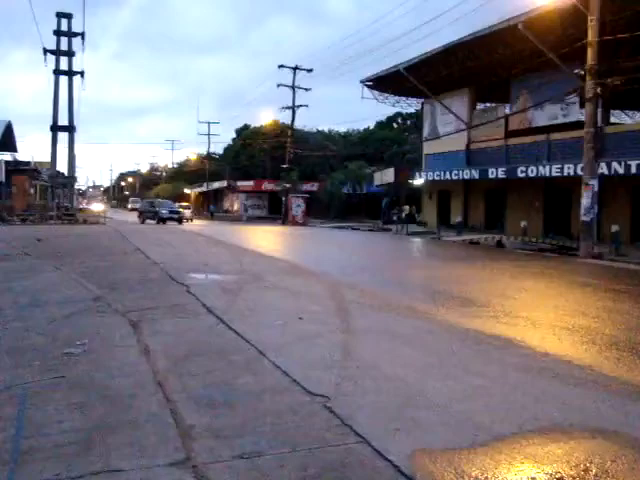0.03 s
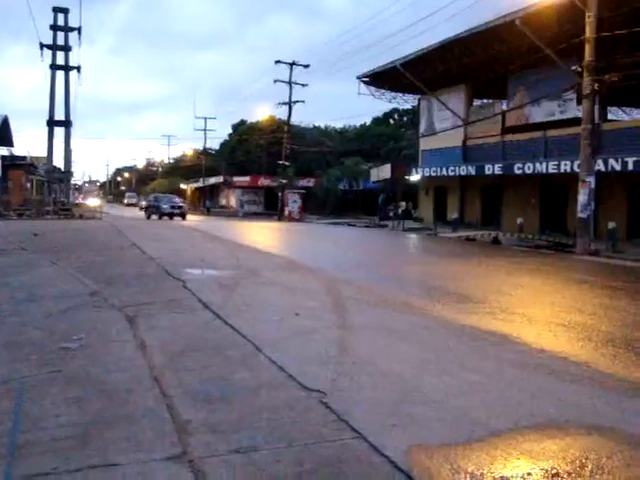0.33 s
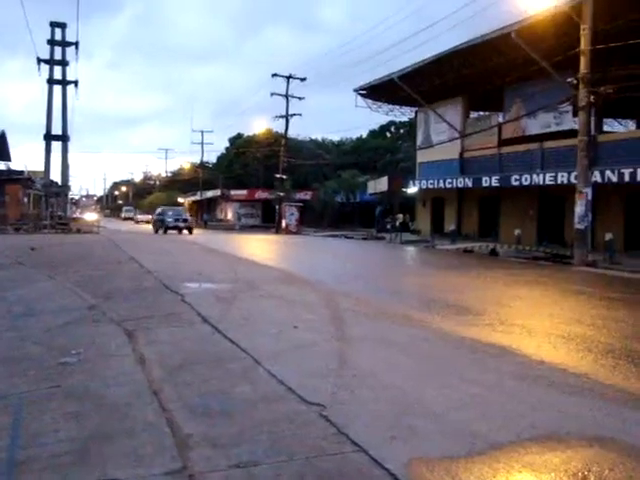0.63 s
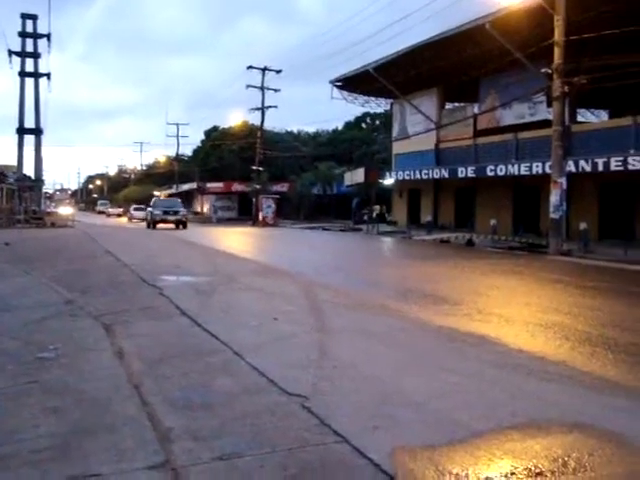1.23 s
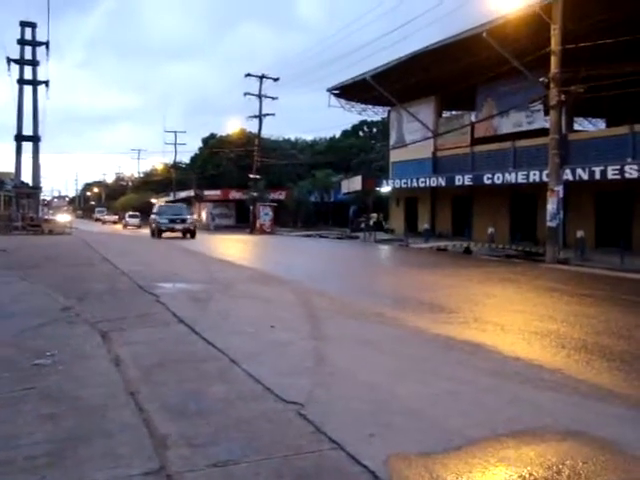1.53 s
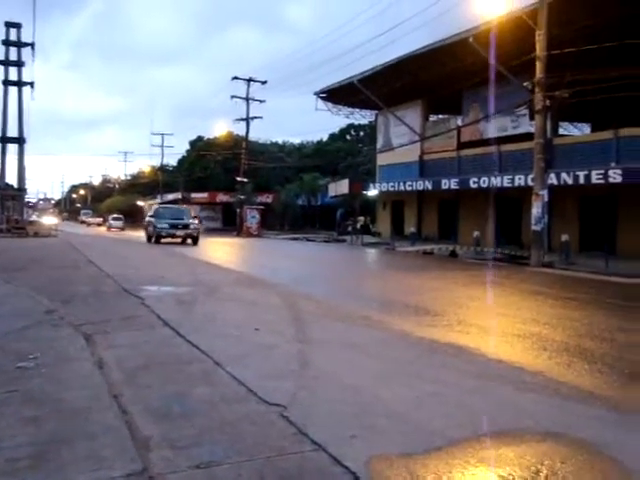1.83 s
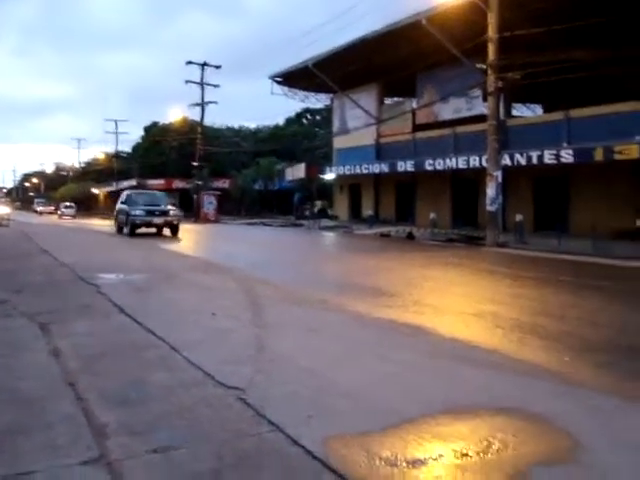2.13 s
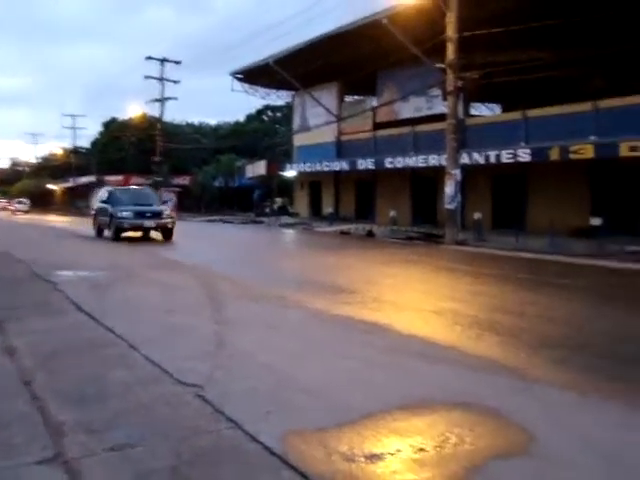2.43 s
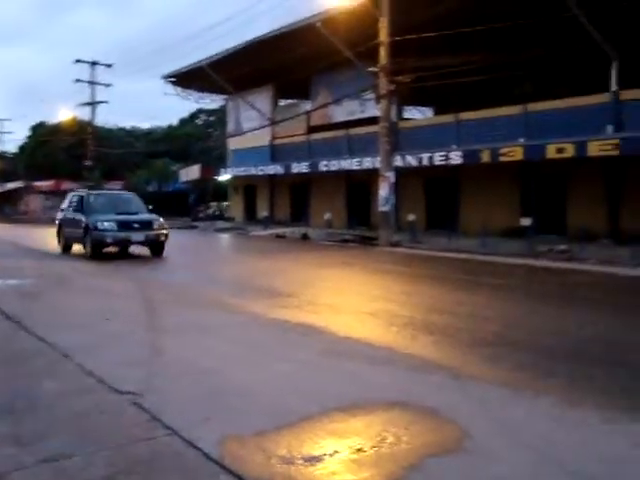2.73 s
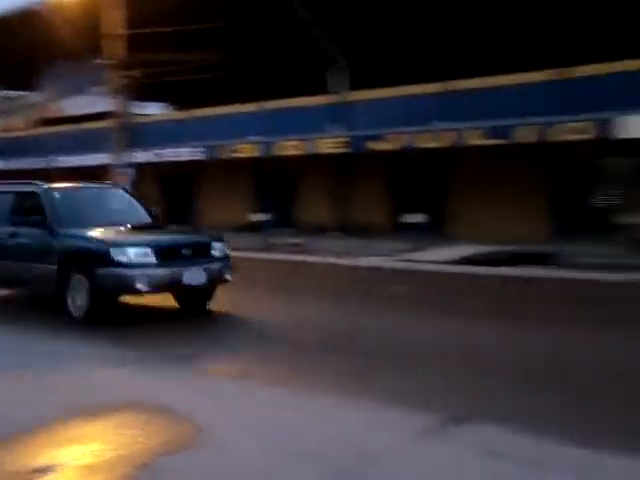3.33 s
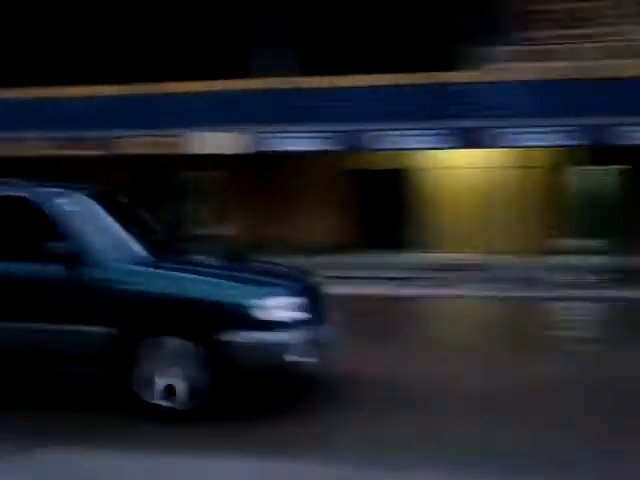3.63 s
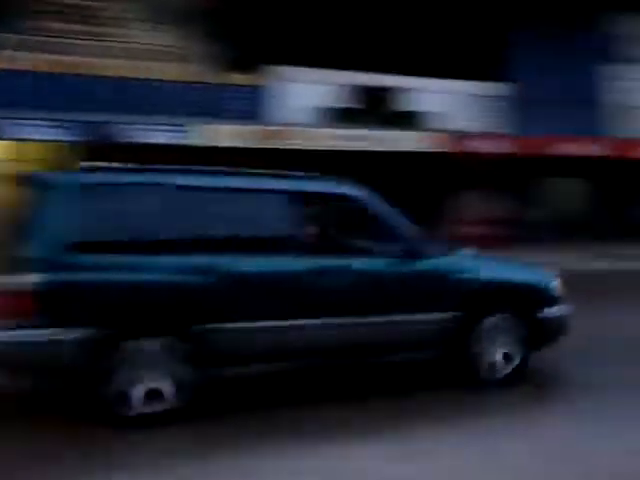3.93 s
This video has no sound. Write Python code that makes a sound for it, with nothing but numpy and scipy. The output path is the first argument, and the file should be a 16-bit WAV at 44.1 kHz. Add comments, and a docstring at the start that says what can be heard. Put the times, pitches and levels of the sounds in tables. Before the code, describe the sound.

A burbling turbo car engine revs up, drops away with a sharp whistle and hiss, then climbs and vents again close by. Tyres swish louder on the wet street as it nears, over faint distant traffic.

```python
"""A burbling four-cylinder turbo car accelerates towards the listener on a wet street.
Twice the throttle shuts for a gear change: the exhaust drops away and the blow-off valve vents
with a fluttering whistle and a hiss. Uneven firings make the exhaust boom, growl and pop.
Tyre swish and intake rush grow as the car nears; house fronts answer, over far traffic."""
import sys
import numpy as np
from scipy import signal
from scipy.fft import rfft, irfft, next_fast_len
from scipy.io import wavfile
from scipy.ndimage import map_coordinates

SR = 44100
rng = np.random.default_rng(int(sys.argv[2]) if len(sys.argv) > 2 else 0)


def waveform_to_disk(signal):
    """Save audio, clipped to [-1, 1], as 16-bit WAV at the path in sys.argv[1]."""
    frames = np.transpose(np.atleast_2d(signal))
    scaled = np.clip(frames, -1, 1) * 32767
    samples = np.round(scaled).astype(np.int16)
    wavfile.write(sys.argv[1], SR, samples)


N = 176400
T = np.arange(N) / SR

# the four firings of one engine cycle (strength [gain])
CYLINDERS = [1.02, 0.3, 1.15, 1.22]


def amp(db):
    """Decibels to gain."""
    return 10 ** (np.asarray(db) / 20)


def unit(x):
    """Scale to rms 1."""
    return x / np.sqrt(np.mean(np.abs(x) ** 2) + 1e-20)


def along(points, hz):
    """Read (frequency, value) points on a log axis."""
    freqs, values = np.transpose(points)
    return np.interp(np.log(hz + 1), np.log(freqs + 1), values)


def curves(rows):
    """One envelope for each column after the time."""
    times, *columns = np.transpose(rows)
    return [np.interp(T, times, column) for column in columns]


def wobble(rate):
    """A smooth random curve, rate knots a second."""
    return map_coordinates(rng.standard_normal(int(N * rate / SR) + 6), [T * rate + 2])


def flutter(width_hz):
    """Random amplitude and phase of a narrow resonance."""
    hz = np.fft.fftfreq(N, 1 / SR)
    return unit(np.fft.ifft(np.exp(2j * np.pi * rng.random(N)) / (1 + (hz / width_hz) ** 2)))


def gate(start, length, attack, release):
    """Rise, hold and exponential release, in seconds."""
    return np.clip((T - start) / attack, 0, 1) * np.exp(-np.maximum(T - start - length, 0) / release)


def swell(centre, half_length):
    """A bell-shaped rise and fall."""
    return np.exp(-((T - centre) / half_length) ** 2)


def filtered(x, response):
    """x through a frequency response."""
    size = next_fast_len(N + SR // 2)
    return irfft(rfft(x, size) * response(np.fft.rfftfreq(size, 1 / SR)), size)[:N]


def coloured(x, spectrum):
    """x through an EQ curve, at rms 1."""
    return unit(filtered(x, lambda hz: amp(along(spectrum, hz))))


def noise(spectrum):
    """Coloured noise of rms 1."""
    return coloured(rng.standard_normal(N), spectrum)


def far_traffic():
    """A steady, low bed of distant traffic."""
    # traffic colour (frequency [Hz], level [dB])
    colour = [(20, -30.5), (50, -19), (90, -16), (125, 5.5), (200, -7), (600, -4.5), (3000, -4.5),
              (10000, -15)]
    return amp(-37) * noise(colour)


def house_fronts(x, wet_db):
    """x with the short, darkening answer of the house fronts, at about the same power."""
    # street reverb (frequency [Hz], time to fall 60 dB [s])
    decay = [(150, 0.52), (1000, 0.52), (9000, 0.22)]
    hz, t, bands = signal.stft(rng.standard_normal(SR // 2), SR, nperseg=256)
    tail = signal.istft(bands * amp(-60 * t / along(decay, hz)[:, None]), SR, nperseg=256)[1]
    echo = signal.fftconvolve(x, tail / np.linalg.norm(tail))[:N]
    return (x + amp(wet_db) * echo) / np.hypot(1, amp(wet_db))


def road_bounce(x, far_lag_s=0.004, near_lag_s=0.008):
    """x with its bounce off the road, which lags more as the car nears."""
    lag_s = np.interp(T, [0, T[-1]], [far_lag_s, near_lag_s])
    return unit(x + 0.22 * map_coordinates(x, [(T - lag_s) * SR], order=1))


def approaching(x, far, near, from_s=1.86, to_s=3.2):
    """Crossfade from the far to the near colour as the car goes from head-on to side-on."""
    nearness = np.clip((T - from_s) / (to_s - from_s), 0, 1)
    return unit((1 - nearness) * coloured(x, far) + nearness * coloured(x, near))


def tyres_and_intake():
    """Tyres swish and roar on wet asphalt while the turbo draws in air."""
    # three stretches of rush outside the gear changes (time [s], mids [dB], treble [dB])
    in_gear = [
        [(0.14, -35, -53), (0.224, -34.5, -46.5), (0.32, -27.5, -39.5), (0.47, -31.5, -44), (0.6, -31.5, -43)],
        [(0.7, -32, -44), (0.864, -31, -41.5), (0.962, -30.5, -44), (1.272, -24.5, -34.5), (1.66, -22.5, -34.5)],
        [(2.2, -27.5, -39), (2.506, -31.5, -41), (2.916, -27.5, -33.5), (2.964, -28.5, -37), (3.54, -23.5, -31)],
    ]
    # rush during the gear changes, dipping briefly under the loud first whistle (same columns)
    gear_changes = [(1.72, -27.5, -38), (1.8, -35, -46), (1.87, -26, -33), (2.05, -27, -36.5),
                    (3.6, -29.5, -36.5), (4, -29, -30.5)]
    # colours of the far and near rush, the spray and the tread (frequency [Hz], level [dB])
    rush_far = [(650, -22), (1100, -8.5), (1540, -10.5), (1760, -2.5), (1910, -6.5), (2070, -3),
                (2350, -2.5), (2540, -7), (2790, -3.5), (3060, -6.5), (4740, -15), (5500, -14.5),
                (7150, -40.5), (12100, -120)]
    rush_near = [(700, -31.5), (1100, -12.5), (1550, -7), (1800, -2.5), (2080, -11), (2280, -5.5),
                 (2500, 1), (2800, 3.5), (3000, 2), (3220, -1), (3550, 1.5), (3800, -1.5), (4050, -6),
                 (5500, -9.5), (7500, -55)]
    spray_colour = [(2470, -15), (4200, -4), (5840, 2), (7800, -3.5), (9590, -1), (10000, -4), (10300, -42),
                    (13400, -43), (22000, -120)]
    tread_colour = [(200, -49), (600, -23), (920, 2.5), (1350, -10), (2000, -4), (4000, -34.5)]
    # tread roar envelope (time [s], level [dB])
    tread_level = [(0, -38.5), (2, -35.5), (3.3, -23.5), (3.7, -32), (4, -27.5)]
    mid_db, treble_db = curves(sorted(map(tuple, np.vstack([*in_gear, gear_changes]))))
    rush_gain = amp(mid_db - 1 + 0.85 * wobble(25.1))
    rush = approaching(rng.standard_normal(N), rush_far, rush_near) * amp(0.82 * wobble(300))
    spray_gain = amp(treble_db + 2 + 1.1 * wobble(25.76))
    spray = unit(noise(spray_colour) * amp(1.66 * wobble(400)))
    tread = amp(curves(tread_level)[0]) * noise(tread_colour)
    return rush_gain * road_bounce(rush) + spray_gain * spray + tread


def firings(cycles, jitter_s, scatter_db=3.5):
    """One pulse per firing, uneven from cylinder to cylinder."""
    # lag of each firing in the unequal pipes (delay [cycles])
    pipe_lag = [-0.0023, 0.0805, 0.0331, -0.037]
    firing = np.arange(int(cycles[-1] * len(CYLINDERS)))
    jitter, scatter = rng.standard_normal((len(firing), 2)).T
    cylinder = firing % len(CYLINDERS)
    times = np.interp(firing / len(CYLINDERS) + np.take(pipe_lag, cylinder), cycles, T)
    times += jitter_s * jitter
    strength = np.take(CYLINDERS, cylinder) * amp(scatter_db * scatter)
    return np.bincount(np.clip(times * SR, 0, N - 1).astype(int), strength, N)


def engine_note(cycles, order, rough):
    """A roughened tone at order times the engine's cycle rate."""
    carrier = np.exp(2j * np.pi * (order * cycles + rng.random()))
    return np.sqrt(2) * np.real(carrier * (1 + rough * flutter(width_hz=17))) / np.hypot(1, rough)


def firing_notes(cycles):
    """The two strongest exhaust notes throb at the firing rate and its octave."""
    # envelopes of the two notes (time [s], level [dB])
    firing_level = [(.13, -35), (.7, -38.5), (.81, -23), (1.04, -35), (1.1, -21), (1.15, -32),
                    (1.205, -17.5), (1.27, -26), (1.315, -40), (1.35, -20.5), (1.39, -16.5), (1.44, -15.5),
                    (1.475, -30), (1.52, -21), (1.565, -14.5), (1.62, -18.5), (1.685, -18.5), (1.712, -35),
                    (2.1, -42.5), (2.3, -33), (3, -29), (3.45, -31), (3.55, -16.5), (3.59, -43),
                    (3.85, -39), (4, -34)]
    octave_level = [(.13, -25.5), (.26, -22.5), (.36, -31), (.52, -32.5), (.57, -20), (.72, -24.5),
                    (.8, -31.5), (1.08, -30.5), (1.2, -35.5), (1.68, -27.5), (1.75, -65), (2.2, -39.5),
                    (2.36, -22.5), (2.415, -27.5), (2.47, -21), (2.54, -21.5), (2.59, -34), (3.1, -29.5),
                    (3.21, -22.5), (3.32, -26.5), (3.37, -16.5), (3.44, -27), (3.5, -37), (3.62, -39.5),
                    (4, -58)]
    firing = amp(curves(firing_level)[0]) * engine_note(cycles, order=4, rough=0.33)
    octave = amp(curves(octave_level)[0]) * engine_note(cycles, order=8, rough=0.35)
    throb = unit(amp(1.6 * wobble(40)))
    return amp(1.5) * (firing + octave) * throb


def pipe_crests(cycles):
    """Timed swells of single notes, as when they sweep through a pipe resonance."""
    # swells (time [s], half-length [s], order [x cycle rate], level [dB])
    crests = [(2.372, 0.027, 25, -24), (2.644, 0.15, 25, -26.5), (3.014, 0.094, 20, -24.5),
              (3.203, 0.34, 5, -23), (3.242, 0.14, 21, -25.5), (3.324, 0.027, 23, -21),
              (3.521, .05, 20, -25), (3.93, 0.11, 9, -33), (3.877, 0.12, 4, -33)]
    return sum(amp(db) * swell(time, half_length) * engine_note(cycles, order, rough=0.35)
               for time, half_length, order, db in crests)


def exhaust_burble(cycles):
    """Weaker, rough low notes from the uneven firing."""
    # burble notes (order [x cycle rate], level [dB])
    notes = [(5, -5.5), (7, -12), (9, -15), (10, -19), (12, -13), (13, -14)]
    return sum(amp(db) * engine_note(cycles, order, rough=0.75) for order, db in notes)


def exhaust_growl(cycles, cycle_hz):
    """Higher rough notes, coloured by the pipe as they glide with the revs."""
    # growl notes (order [x cycle rate], level [dB])
    notes = [(12, -14), (16, -8), (17, -11), (20, -11.5), (21, -12.5), (22, -12), (23, -20), (24, -15),
             (25, -13), (26, -13), (31, -12.5)]
    # pipe colour (frequency [Hz], level [dB])
    pipe = [(250, 9.5), (560, -6.5), (680, -7.5), (860, 1), (1000, -7.5), (1300, -11.5), (2000, -17)]
    return sum(amp(db + along(pipe, order * cycle_hz)) * engine_note(cycles, order, rough=0.8)
               for order, db in notes)


def exhaust_boom(cycles):
    """The low thud of the firings in the pipe, echoed by the street."""
    # boom colour (frequency [Hz], level [dB])
    colour = [(30, -49), (60, -27), (95, -17), (130, 0.5), (185, 4), (235, -8.5), (310, -1.5), (380, -7.5),
              (450, -2.5), (600, -26.5), (1000, -69)]
    thuds = coloured(firings(cycles, jitter_s=0.00087), colour)
    return unit(house_fronts(thuds, wet_db=-2.5))


def exhaust_roar(cycles):
    """Midrange pulses in the pipe and a gas rasp that pumps at the firing rate."""
    # roar colour from afar and close by (frequency [Hz], level [dB])
    far = [(190, -33.5), (330, -3.5), (456, -14), (579, -0.5), (656, -1.5), (764, -1.5), (950, -15.5),
           (1120, -6.5), (1250, -17.5), (1600, -13), (2080, -47), (3520, -120)]
    near = [(200, -40.5), (320, 10.5), (400, -27), (450, 0.5), (560, -3), (680, 3), (800, 3.5), (930, -0.5),
            (1050, -1.5), (1170, -3), (1300, -5), (1550, -11), (2100, -12), (4000, -66.5)]
    pulses = approaching(firings(cycles, jitter_s=0.00032), far, near)
    pulses = unit(house_fronts(pulses, wet_db=-1.5))
    gas = approaching(rng.standard_normal(N), far, near)
    pumping_db = 1.9 * np.cos(2 * np.pi * len(CYLINDERS) * cycles) + 1.1 * wobble(60)
    rasp = unit(gas * amp(pumping_db))
    return amp(-6) * pulses + amp(-3.5) * rasp


def exhaust():
    """The exhaust layers follow the revs and drop away at each gear change."""
    # revs, four firings to a cycle (time [s], cycle rate [Hz])
    revs = [(.13, 31.44), (.3, 30.72), (.5, 29.35), (.62, 31.4), (.8, 34.75), (1, 37.8), (1.12, 40.44),
            (1.38, 45.54), (1.57, 48.72), (1.69, 51), (1.76, 50.3), (1.88, 39.05), (2.05, 35.8), (2.21, 31),
            (2.35, 30.46), (2.5, 32.29), (2.8, 34.79), (3.04, 37.48), (3.37, 39.93), (3.47, 41.1),
            (3.57, 45.98), (3.66, 42.18), (3.8, 31.61), (4, 29.82)]
    # engine load (time [s], boom level [dB], roar level [dB])
    load = [(.14, -28.5, -29), (.45, -28.5, -27), (.72, -24.5, -24), (.82, -19.5, -24), (.96, -21, -24.5),
            (1.05, -21.5, -22), (1.26, -18.5, -23), (1.3, -24, -21), (1.36, -24, -21.5), (1.55, -23, -18.5),
            (1.68, -22, -23.5), (1.705, -29, -28), (1.81, -38, -33.5), (2.03, -29.5, -30),
            (2.18, -28.5, -22.5), (2.21, -21, -23.5), (2.35, -26, -22.5), (2.6, -21.5, -19.5),
            (2.75, -19, -19), (2.9, -18.5, -19), (3.3, -21.5, -18), (3.47, -23, -19), (3.555, -18, -19),
            (3.58, -34, -41), (3.74, -32, -31), (3.87, -30.5, -29), (4, -25, -24.5)]
    cycle_hz, = curves(revs)
    cycles = np.cumsum(cycle_hz) / SR
    boom_db, roar_db = curves(load)
    notes = firing_notes(cycles) + pipe_crests(cycles)
    burble = exhaust_burble(cycles)
    growl = amp(-0.5) * exhaust_growl(cycles, cycle_hz)
    lows = burble + amp(-3.5) * exhaust_boom(cycles)
    mids = growl + exhaust_roar(cycles)
    return notes + amp(boom_db) * lows + amp(roar_db + 0.4 * wobble(20)) * mids


def tailpipe_pops():
    """Stronger firings that knock or ring briefly in the tailpipe."""
    # pops and chugs (time [s], peak [dB], pitch [Hz], half-length [s])
    pops = [(0.874, -18, 290, 0.0063), (0.959, -4, 336, 0.0017), (0.965, -15.5, 329, 0.015),
            (1.108, -16.5, 317, .012), (1.335, -17, 592, .018), (2.219, -15, 235.2, 0.0095),
            (2.662, -14.5, 810.4, 0.0072), (2.704, -12, 305, 0.0085), (2.806, -11.5, 256, .006),
            (3.186, -13, 303, 0.0028), (3.459, -10, 328.1, 0.0094)]
    return sum(amp(db) * np.cos(2 * np.pi * (hz * (T - time) + rng.random())) * swell(time, half_length)
               for time, db, hz, half_length in pops)


def jet_stalls(per_second=77, stall_s=0.0019):
    """Gain of a jet that breaks off briefly at uneven moments."""
    count = int(per_second * N / SR)
    times = (np.arange(count) + rng.random(count)) / per_second
    after = np.clip(np.searchsorted(times, T), 1, count - 1)
    to_nearest = np.minimum(np.abs(T - times[after - 1]), np.abs(times[after] - T))
    return 1 - np.exp(-(to_nearest / stall_s) ** 2)


def valve_whistle(waver_hz=43.4, fade_db_per_s=41):
    """The valve's note starts hollow, flutters, sags with the pressure and lingers as a ragged band."""
    # whistles (start [s], length [s], tone [dB], afterglow [dB], undertone [dB])
    whistles = [(1.687, 0.12, -15.5, -19.5, -31), (3.565, 0.083, -13.5, -23.5, -23)]
    # one pitch curve per whistle: it sags, catches and sags again (time [s], pitch [Hz])
    pitches = [
        [(1.69, 7150), (1.706, 6900), (1.74, 7100), (1.765, 6760), (1.8, 6867), (1.86, 6650), (1.875, 6990),
         (1.91, 6807)],
        [(3.566, 7220), (3.578, 7118), (3.594, 6800), (3.615, 6940), (3.638, 6970), (3.648, 6840), (3.9, 6560)],
    ]
    out = np.zeros(N)
    for (start, length, tone_db, glow_db, under_db), pitch in zip(whistles, pitches):
        phase = 2 * np.pi * np.cumsum(curves(pitch)[0] + waver_hz * wobble(70)) / SR
        carrier = np.exp(1j * phase)
        swing = flutter(width_hz=170)
        tone = unit(np.real(carrier * swing / np.hypot(0.5, np.abs(swing))) * jet_stalls())
        undertone = unit(np.cos(phase / 2))  # an octave below
        glow = unit(np.real(carrier * flutter(width_hz=190)) * jet_stalls() * amp(1.5 * wobble(45)))
        fade_db = fade_db_per_s * np.maximum(T - start - length, 0)
        out += amp(tone_db) * tone * gate(start, length, attack=0.00087, release=0.0061)
        out += amp(under_db) * undertone * gate(start, 0, attack=0.001, release=0.022)
        out += amp(glow_db - fade_db) * glow * np.clip((T - start) / length, 0, 1)
    return out


def valve_air():
    """A chuff as the blow-off valve cracks open, then a broad hiss that swells on the second vent."""
    # vents (start [s], length [s], level [dB], swell [dB], release [s])
    vents = [(1.673, 0.31, -24, 0, 0.053), (3.558, .21, -24.5, 6.5, 0.08)]
    # colours of the hiss and the chuff (frequency [Hz], level [dB])
    hiss_colour = [(900, -24), (1700, -9), (1900, 1.5), (2600, -5), (2820, 5.5), (3150, 2), (3700, 1.5),
                   (4100, -1), (4950, -2.5), (5600, 2), (6600, 2), (7800, -5.5), (9000, 0.5), (10300, -6)]
    chuff_colour = [(1200, -29), (2200, 5), (3300, 5), (4500, -5), (6000, -24), (10000, -12)]
    hiss_gain, chuff_gain = np.zeros((2, N))
    for start, length, db, swell_db, release in vents:
        progress = np.clip((T - start) / length, 0, 1)
        hiss_gain += amp(db + swell_db * progress) * gate(start, length, attack=0.0059, release=release)
        chuff_gain += amp(-19.5) * gate(start, 0, attack=0.0018, release=0.023)
    hiss = hiss_gain * amp(0.71 * wobble(30.4)) * road_bounce(noise(hiss_colour))
    return hiss + chuff_gain * noise(chuff_colour)


def scene():
    """The car in the street, in mono."""
    car = exhaust() + tailpipe_pops() + tyres_and_intake()
    blow_off = house_fronts(valve_whistle() + valve_air(), wet_db=-14)
    return (car + blow_off + far_traffic())[None]


def record(dry, start_s=0.128, cutoff_hz=10050):
    """The sound cuts in after a moment of silence, through a steep low-pass."""
    fade_in = np.clip((T - start_s) / 0.003, 0, 1)
    return filtered(dry[0] * fade_in, lambda hz: amp(-np.clip((hz - cutoff_hz) / 9, 0, 120)))[None]


dry = scene()
out = record(dry)
waveform_to_disk(out)
```